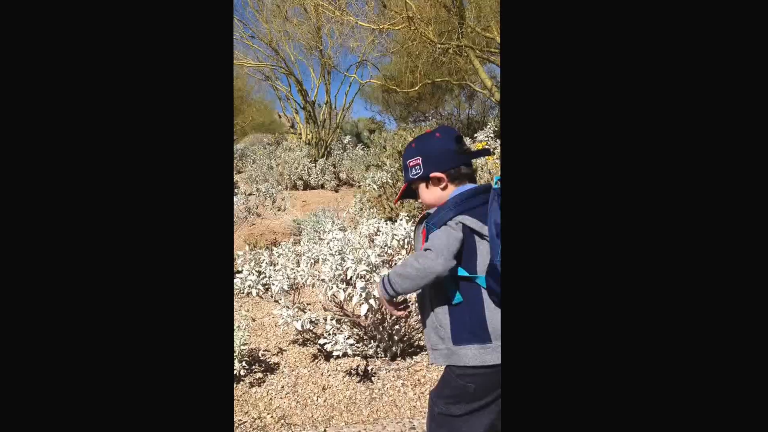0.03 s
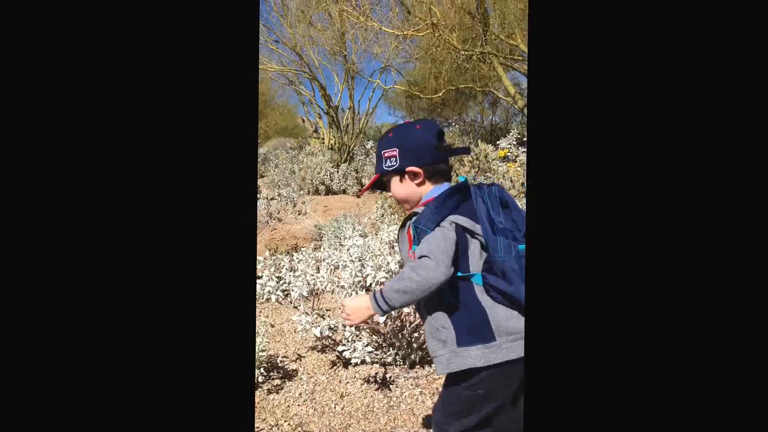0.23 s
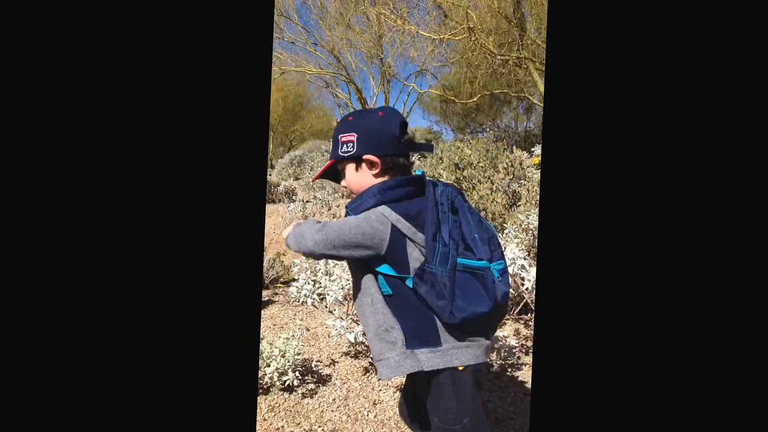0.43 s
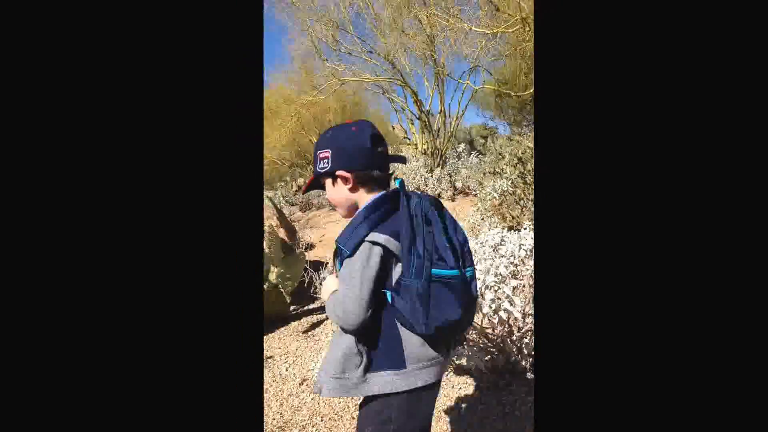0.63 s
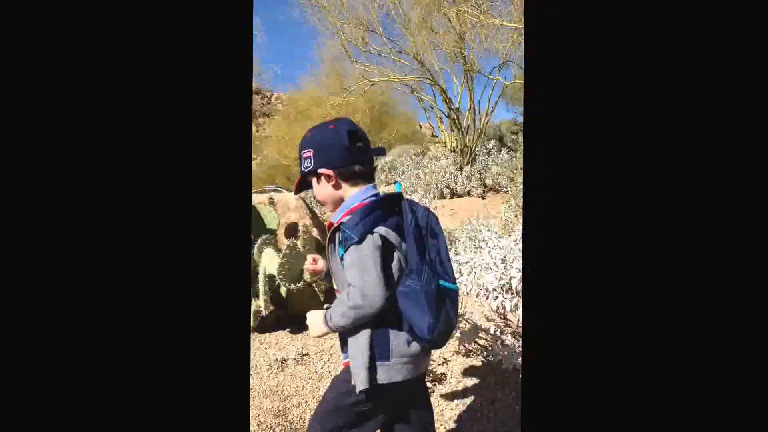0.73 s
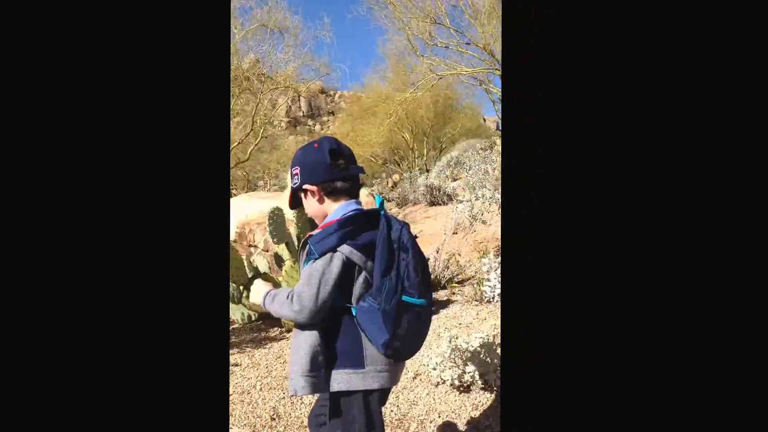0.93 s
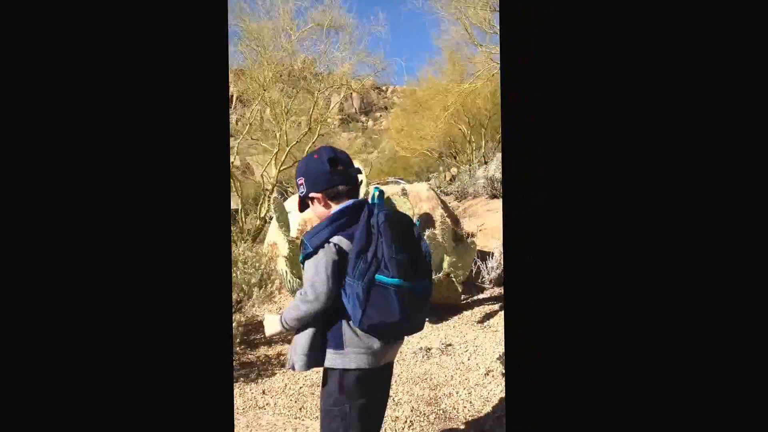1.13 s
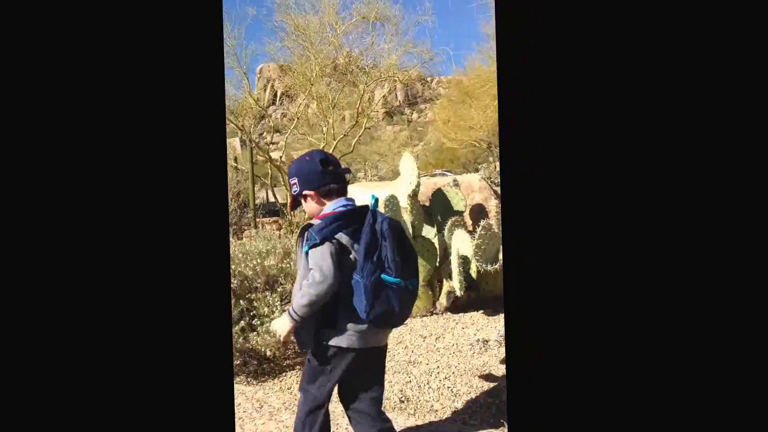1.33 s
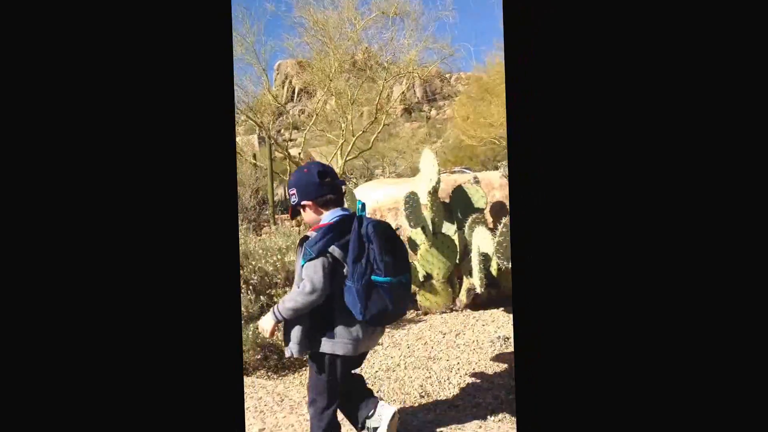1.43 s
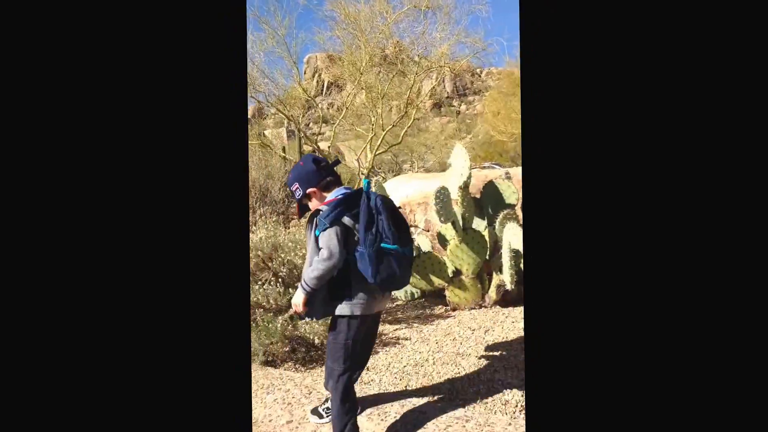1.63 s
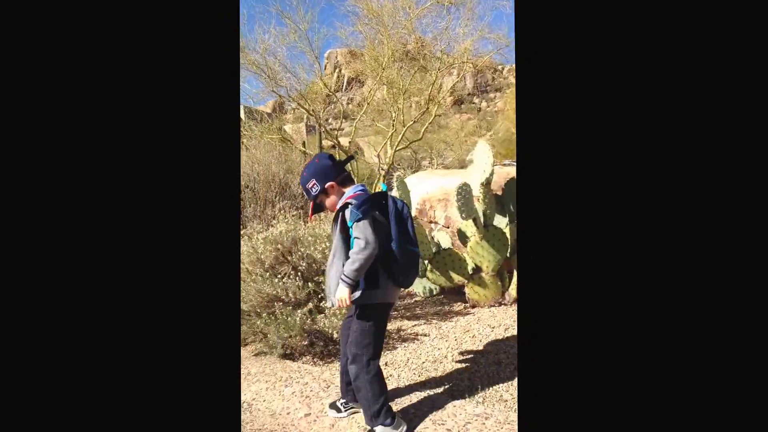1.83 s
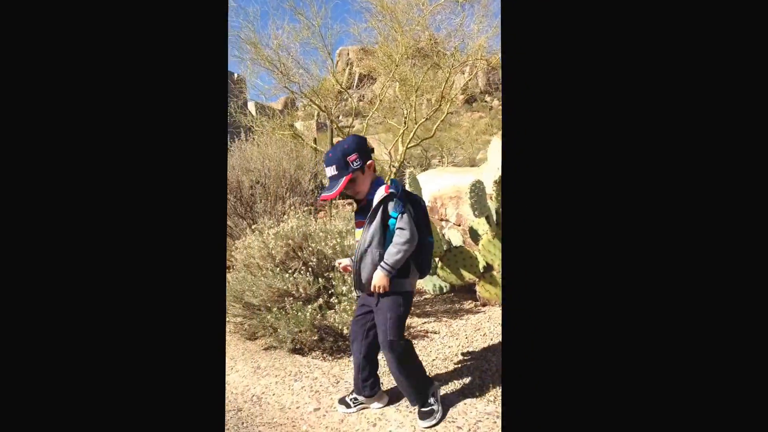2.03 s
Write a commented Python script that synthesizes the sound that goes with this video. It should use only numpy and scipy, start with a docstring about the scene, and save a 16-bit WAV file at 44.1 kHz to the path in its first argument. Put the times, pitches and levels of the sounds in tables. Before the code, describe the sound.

Footsteps of a walking child crunch, scrape and snap small stones on dry gravel, close to a hand-held microphone. Low wind buffets and handling bumps come first, a tiny metal zip pull jingles, then steps grow quieter.

```python
"""After a moment of silence, a child with a backpack walks over fine gravel, close to a hand-held microphone.
In the first second, low buffets and bumps on the microphone (coloured noise, short low swings) cover
the quiet outdoor air. From start to end soles scuff and crunch (showers of filtered grains), drag (gliding
resonances) and snap stones (noise bursts with a ring), while a metal zip pull jingles (decaying modes).
Later the child moves away: rumble and scuffs are mostly weaker, and stones still snap."""
import sys
import numpy as np
from scipy import signal
from scipy.io import wavfile
from scipy.ndimage import uniform_filter1d

SR = 44100
rng = np.random.default_rng(int(sys.argv[2]) if len(sys.argv) > 2 else 0)


def to_wav(sig):
    """Store sig (one row per channel, or 1-D mono) as 16-bit WAV at the path in sys.argv[1].

    Samples outside -1..1 are clipped; the rate is SR.
    """
    pcm = np.clip(np.atleast_2d(sig), -1, 1) * 32767
    pcm = np.round(pcm).astype(np.int16)
    wavfile.write(sys.argv[1], SR, pcm.T)  # frames by channels


N = 91728  # samples
TIME = np.arange(N) / SR


def amp(db):
    """Decibels to gain."""
    return 10 ** (np.asarray(db) / 20)


def unit(x):
    """Scales to an rms of one."""
    return x / np.sqrt(np.mean(x ** 2) + 1e-20)


def add(mix, s, sound):
    """Mixes a sound in at a time in seconds."""
    part = mix[max(round(s * SR), 0):][:len(sound)]
    part += sound[:len(part)]


def colour(x, points, size=4096):
    """Causal minimum-phase filter of unit energy, its spectrum drawn through (Hz, dB) points."""
    hz, db = np.transpose(points)
    bin_hz = abs(np.fft.fftfreq(size, 1 / SR)) + 1  # the 1 keeps the logarithm finite
    log_gain = np.log(amp(np.interp(np.log(bin_hz), np.log(hz), db)))
    taps = np.fft.ifft(np.exp(np.conj(signal.hilbert(log_gain)))).real
    return signal.fftconvolve(x, taps / np.linalg.norm(taps))[:len(x)]


def steady(x, span_s):
    """Evens out the swells of a noise that are slower than the span."""
    size = max(int(span_s * SR), 2)
    power = uniform_filter1d(uniform_filter1d(x ** 2, size), size)
    return x / np.sqrt(abs(power) + 1e-12)


def noise(points):
    """Coloured noise at unit level."""
    return unit(colour(rng.standard_normal(N), points))


# Colour of the quiet air around the microphone. Each row: frequency in Hz, relative level in dB per Hz.
AIR_COLOUR = [(20, 0), (60, 11), (150, 0.5), (300, 0), (600, -6), (1200, -10), (2500, -14.5), (5000, -16),
              (10000, -18.5), (15500, -19.5)]
AIR_DB = -57.5


def air():
    """Quiet open air is a steady noise, weaker towards the treble."""
    return amp(AIR_DB) * noise(AIR_COLOUR)


# Rise and fall of the rumble at the microphone. Each row: time in seconds, level in dB.
RUMBLE_LEVEL = [(.03, -35), (.065, -31.5), (.10, -29), (.14, -39.5), (.20, -30.5), (.27, -28), (.305, -44),
                (.42, -39.5), (.455, -43.5), (.51, -40), (.55, -45.5), (.58, -64), (.67, -40), (.76, -38.5),
                (.785, -69), (.82, -45), (.885, -34), (.94, -59), (1.0, -72), (1.38, -54.5), (1.7, -60),
                (1.98, -57), (2.04, -49.5), (2.08, -62)]
# Colour of that rumble. Each row: frequency in Hz, relative level in dB per Hz.
RUMBLE_COLOUR = [(20, -65.5), (40, -19), (70, 3), (120, -2.5), (200, -6.5), (300, -12.5), (450, -33),
                 (800, -49), (2000, -85)]
# One hard buffet on the microphone. Each row: time in seconds, level in dB.
BUFFET_LEVEL = [(.200, -68), (.222, -20), (.240, -20.5), (.272, -37.5), (.300, -55)]
# Colour of that buffet. Each row: frequency in Hz, relative level in dB per Hz.
BUFFET_COLOUR = [(50, -26), (200, 5.5), (400, -9), (570, -8.5), (780, -24.5), (1050, -39.5), (1600, -58),
                 (4000, -82)]


def wind():
    """Air buffets the microphone: a lumpy low rumble, with one harder and brighter buffet."""
    rumble_gain = amp(np.interp(TIME, *np.transpose(RUMBLE_LEVEL)))
    buffet_gain = amp(np.interp(TIME, *np.transpose(BUFFET_LEVEL), left=-120, right=-120))
    rumble = steady(noise(RUMBLE_COLOUR), 0.064) * rumble_gain
    buffet = steady(noise(BUFFET_COLOUR), 0.017) * buffet_gain
    return rumble + buffet


# Dull bumps of handling and footfall at the microphone.
# Each row: start in seconds, peak of the envelope in dB, pitch in Hz, time to that peak in seconds.
BUMPS = [ (.060, -21, 173, 0.0023), (0.094, -26.5, 398, 0.0021), (0.1, -21.5, 155.4, 0.0091),
         (0.176, -20.5, 107, 0.0047), (0.611, -39, 180, 0.0026), (0.224, -14.5, 214, 0.0053),
         (.241, -22.5, 460, 0.0019), (.251, -16, 220, 0.0031), (.264, -18.5, 330, 0.0021),
         (0.504, -29, 110, 0.0037), (0.74, -22.5, 90, 0.0071), (.750, -24, 242, 0.0019),
         (0.81, -31.5, 194, 0.0021), (0.856, -21.5, 113, 0.0025), (.880, -20, 158, 0.0015),
         (.951, -27.5, 406, 0.0032), (1.138, -36.5, 286, 0.00098), (1.365, -35.5, 197, 0.0015),
         (1.624, -39.5, 174, 0.0028), ]


def bumps():
    """A soft blow sets off a few low cycles that swell and die away."""
    t, out = np.arange(SR // 8) / SR, np.zeros(N)
    for s, db, hz, peak_s in BUMPS:
        envelope = t / peak_s * np.exp(1 - t / peak_s)
        add(out, s, amp(db) * envelope * np.sin(2 * np.pi * hz * t))
    return out


# Strikes of the zip pull on the backpack. Each row: start in seconds, ring level in dB, time it hangs
# free in seconds, extra level of its lowest mode in dB, clack level of its link in dB.
JINGLES = [(.049, -45.5, 0.016, -16, -44.5), (.068, -60, .008, -10, -66), (.766, -60, .015, 1, -70),
           (.920, -58, .015, -2, -58), (0.932, -52.5, 0.064, 1, -52), (1.002, -64.5, 0.014, 10, -68),
           (1.044, -65, 0.028, 1, -68), (1.073, -59, .042, -4, -70), (1.178, -39.5, 0.059, -15, -42.5),
           (1.181, -47, 0.0037, -4, -56), (1.204, -56, .025, 3, -57), (1.235, -50.5, 0.025, 1.5, -64),
           (1.295, -59.5, .014, -2, -56), (1.449, -52, 0.035, -12, -44), (1.461, -45.5, 0.0047, -5, -43),
           (1.496, -55, .017, -8, -68), (1.714, -56, .016, -9, -64)]
# Ringing modes of the zip pull.
# Each row: nominal frequency in Hz, level against the ring in dB, time to fall 60 dB while free in seconds.
ZIP_MODES = [(4695, 0, .15), (6772, -20, .1), (11670, 0, .25), (14510, -16, .25)]
# Short clack of the link that holds it.
# Each row: nominal frequency in Hz, level against the clack in dB, time to fall 60 dB while free in seconds.
CLACK_MODES = [(6342, -8, .03), (7790, -6, .035), (8872, -2, .018), (10410, -8, .02), (11900, -2, .02),
               (13800, -9, .03)]
# the link's thin top ring, equally strong at every touch, with its time to fall 60 dB while free
LINK_HZ, LINK_DB, LINK_T60_S = 14480, -64, .3
# each strike shifts every mode a little, and the ring buzzes against the link
DETUNE_SHARE, BUZZ_SHARE, BUZZ_S = .001, .3, .002


def zip_pull():
    """A small metal tab clacks on its link and rings roughly until it falls back against the cloth."""
    t, out = np.arange(SR // 8) / SR, np.zeros(N)
    for s, ring_db, free_s, low_db, clack_db in JINGLES:
        free = np.exp(-(t / free_s) ** 4)  # the cloth stops every mode
        modes = [(LINK_HZ, LINK_DB, LINK_T60_S)]
        for k, (hz, mode_db, t60) in enumerate(ZIP_MODES):
            modes.append((hz, ring_db + mode_db + low_db * (k == 0), t60))
        for hz, mode_db, t60 in CLACK_MODES:
            modes.append((hz, clack_db + mode_db, t60))
        for hz, mode_db, t60 in modes:
            flutter = uniform_filter1d(rng.standard_normal(len(t)), int(BUZZ_S * SR))
            buzz = 1 + BUZZ_SHARE * unit(flutter)
            detuned_hz = hz * (1 + DETUNE_SHARE * rng.standard_normal())
            ring = np.sin(2 * np.pi * (detuned_hz * t + rng.random()))
            decay = np.exp(-np.log(1000) * t / t60)
            add(out, s, amp(mode_db) * free * buzz * decay * ring)
    return out


# A dragging sole close to the microphone, singing in one fuzzy resonance.
# Each row: start in seconds, length in seconds, level in dB, first and last centre frequency in Hz.
SCRAPES = [(0.685, 0.026, -42.5, 560, 770), (0.689, 0.089, -42, 433.6, 381),
           (0.705, 0.021, -46.5, 802, 950), (0.939, .028, -49.5, 661, 600),
           (0.945, 0.0219, -51.5, 1310, 1135), (1.484, 0.058, -59, 2450, 2210),
           (1.802, 0.075, -57.5, 633, 796)]
SCRAPE_WIDTH_SHARE = 0.18  # sets the bandwidth, as a share of the first frequency


def scrapes():
    """Friction drives a resonance that glides while the sole drags."""
    out = np.zeros(N)
    for s, length_s, db, first_hz, last_hz in SCRAPES:
        progress = np.linspace(0, 1, int(length_s * SR))
        pole = np.exp(-np.pi * SCRAPE_WIDTH_SHARE * first_hz / SR)
        drive = rng.standard_normal(N) + 1j * rng.standard_normal(N)
        # slow complex noise, turned up to the gliding frequency
        waver = signal.lfilter([1], [1, -2 * pole, pole * pole], drive)[-len(progress):]
        turn = np.exp(2j * np.pi * np.cumsum(first_hz + (last_hz - first_hz) * progress) / SR)
        swell = np.sin(np.pi * progress ** 0.6)
        add(out, s, amp(db) * unit((waver * turn).real * swell))
    return out


# Single stones snapping under a sole.
# Each row: start in seconds, body, grit and fizz levels in dB, pitch of the stone in Hz.
STONES = [ (.036, -41, -35.5, -44.5, 920), (0.06, -40, -36.5, -46, 1210), (0.083, -43, -45.5, -47, 1090),
          (0.6095, -35, -32, -46, 1440), (0.612, -57, -43, -71, 1910), (.621, -58, -40, -69, 1720),
          (0.6252, -38, -34.5, -68, 1580), (0.799, -40, -41.5, -65, 2950), (.856, -39, -48, -39.5, 1830),
          (.877, -24, -39.5, -68, 1970), (0.928, -28, -42, -57, 900), (.951, -24, -46, -63, 1240),
          (.963, -35.5, -43, -65, 850), (1.123, -64, -48, -31.5, 2400), (1.172, -35.5, -43, -63, 910),
          (1.215, -31.5, -45, -65, 1400), (1.220, -34.5, -37, -68, 1460), (1.239, -31.5, -50, -62, 987),
          (1.269, -43, -41, -56, 1940), (1.366, -39, -46, -44, 2680), (1.384, -36.5, -44.5, -40.5, 1310),
          (1.462, -36, -52, -56, 900), (1.494, -37, -43, -66, 1100), (1.504, -39, -46, -67, 870),
          (1.52, -33, -55, -65, 2100), (1.612, -40, -44, -47, 3860), (1.628, -37, -49, -54, 900),
          (1.676, -66, -42, -41.5, 4200), (1.691, -65, -41.5, -46, 4160), (1.701, -41, -48, -44, 2160),
          (1.72, -63, -40.5, -43, 3480), (1.842, -68, -59, -33, 4200), ]
# Colour of the packed bed, shared by stones and crunch.
# Each row: frequency in Hz, relative level in dB per Hz.
BODY_COLOUR = [(100, -13.5), (250, -3.5), (420, 6.5), (650, 2), (950, -7), (1500, -21), (4000, -41.5)]
# Colour of the middling gravel, likewise. Each row: frequency in Hz, relative level in dB per Hz.
GRIT_COLOUR = [(300, -24), (800, -6), (1400, 0), (2200, -1), (3200, -7), (4600, -8), (8000, -25),
               (15500, -42)]
# Colour of the finest sand, likewise. Each row: frequency in Hz, relative level in dB per Hz.
FIZZ_COLOUR = [(1000, -3.5), (2800, 0), (4500, 0), (7000, -1), (9500, -2), (12000, -6.5), (15500, -8)]
SNAP_S, SNAP_TAIL_S, SNAP_TAIL_DB = 0.00071, 0.0053, -25.5  # decay constants, tail against the snap
STONE_RING_DB, STONE_RING_S = -4, .0016  # level against the grit, decay constant


def stones():
    """Each stone gives a sharp snap, a short ring at its own pitch and a brief rattle of its neighbours."""
    t = np.arange(2048) / SR
    shape = np.exp(-t / SNAP_S) + amp(SNAP_TAIL_DB) * np.exp(-t / SNAP_TAIL_S)
    out = np.zeros(N)
    for s, body_db, grit_db, fizz_db, hz in STONES:
        for db, points in [(body_db, BODY_COLOUR), (grit_db, GRIT_COLOUR), (fizz_db, FIZZ_COLOUR)]:
            snap = colour(shape * rng.standard_normal(len(t)), points)
            # every draw carries the energy of its shape
            add(out, s, amp(db) * snap * np.linalg.norm(shape) / np.linalg.norm(snap))
        ring = np.exp(-t / STONE_RING_S) * np.sin(2 * np.pi * hz * t)
        add(out, s, amp(grit_db + STONE_RING_DB) * ring)
    return out


# Soles crunching and sliding past the microphone. Each row: time of greatest pressure in seconds,
# rise in seconds, fall in seconds, body, grit and fizz levels in dB.
SCUFFS = [ (0.058, 0.08, 0.05, -47.5, -56.5, -58.5), (0.266, .004, .045, -69, -54.5, -70),
          (0.386, 0.069, 0.07, -57, -57.5, -58.5), (.510, 0.047, 0.49, -62, -62.5, -69),
          (0.609, 0.0033, 0.022, -49.5, -52, -76), (0.691, 0.0074, 0.026, -41, -46, -76),
          (.712, 0.031, 0.034, -58, -53, -53), (0.761, 0.03, 0.021, -47, -54, -59.5),
          (0.81, 0.0038, 0.027, -49.5, -57, -67), (0.88, 0.025, 0.02, -47, -53, -61),
          (0.956, 0.036, 0.054, -48, -53, -58), (1.055, 0.033, 0.16, -61.5, -60.5, -63),
          (1.122, 0.01, 0.017, -50.5, -71, -47), (1.226, 0.039, 0.068, -51, -55, -57),
          (1.388, 0.044, 0.038, -60.5, -58.5, -56), (1.463, 0.013, 0.012, -51, -70, -52.5),
          (1.498, 0.062, 0.062, -57.5, -56, -60.5), (1.695, 0.043, 0.11, -71, -62.5, -62.5),
          (1.845, 0.051, 0.028, -60.5, -57.5, -49.5), ]


def scuff_level(band):
    """Each sole presses, peaks and eases off; gain over time of the body (0), grit (1) or fizz (2)."""
    power = np.zeros(N)
    for s, rise_s, fall_s, *levels in SCUFFS:
        rising = ((TIME - s) / rise_s) ** 2
        falling = (abs(TIME - s) / fall_s) ** np.sqrt(2)
        pressure = np.exp(-np.where(TIME < s, rising, falling))
        power += (amp(levels[band]) * pressure) ** 2
    return np.sqrt(power)


# ticks per second over all pitches, gain on the grit level, pitch range, decay constant in cycles
PEBBLES_PER_S, PEBBLE_DB, PEBBLE_HZ, PEBBLE_CYCLES = 480, 3, (560, 6000), 2.9


def pebbles(count=24, size=1024):
    """Larger grains tick against each other under the sole, at a set of spaced pitches."""
    t, out = np.arange(size) / SR, np.zeros(N)
    for hz in np.geomspace(*PEBBLE_HZ, count):
        hits = (rng.random(N) < PEBBLES_PER_S / count / SR) * rng.standard_normal(N)
        tick = np.exp(-hz * t / PEBBLE_CYCLES) * np.sin(2 * np.pi * hz * t)
        out += signal.oaconvolve(hits, tick)[:N]
    return amp(PEBBLE_DB) * out * scuff_level(1)


GRAINS_PER_S, GRAIN_SPREAD_DB, CLUMP_DB, CLUMP_S = 8200, 3.5, 0.5, .005


def crunch():
    """Clumps of tiny grain collisions swell with the pressure of each sole and die away."""
    unevenness = uniform_filter1d(rng.standard_normal(N), max(int(CLUMP_S * SR), 2))
    clumps = amp(CLUMP_DB * unit(unevenness))
    out = np.zeros(N)
    for band, points in enumerate([BODY_COLOUR, GRIT_COLOUR, FIZZ_COLOUR]):
        sizes = amp(GRAIN_SPREAD_DB * np.minimum(rng.exponential(1, N), 4)) * rng.choice([-1, 1], N)
        hits = rng.random(N) < GRAINS_PER_S / SR
        grains = colour(clumps * sizes * hits, points)
        out += steady(grains, 0.027) * scuff_level(band)
    return out


def scene():
    """Open air and microphone rumble, then the zip pull, then the gravel underfoot."""
    surroundings = air() + wind() + bumps()
    gravel = scrapes() + stones() + pebbles() + crunch()
    return (surroundings + zip_pull() + gravel)[None]


START_S, EDGE_HZ = .034, 15450  # opening silence, upper band edge


def record(dry):
    """The sound opens over 2 ms after a moment of silence; a steep filter removes the highest treble."""
    opened = dry * np.clip((TIME - START_S) / .002, 0, 1)
    low_pass = signal.firwin(401, EDGE_HZ, window=("kaiser", 9), fs=SR)
    return signal.oaconvolve(opened, low_pass[None], "same")


dry = scene()
out = record(dry)
to_wav(out)
```